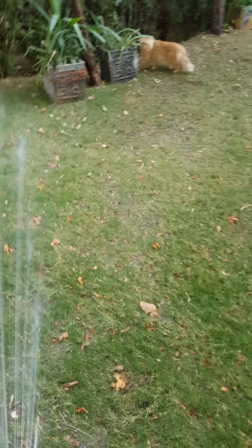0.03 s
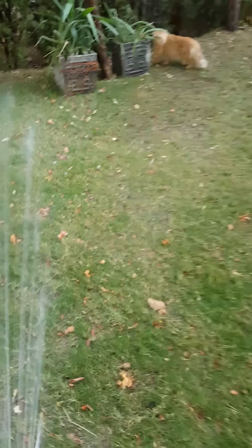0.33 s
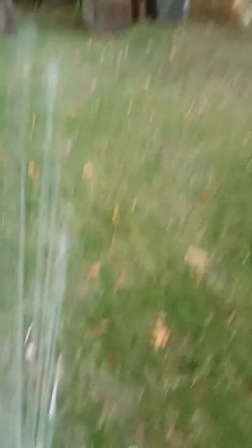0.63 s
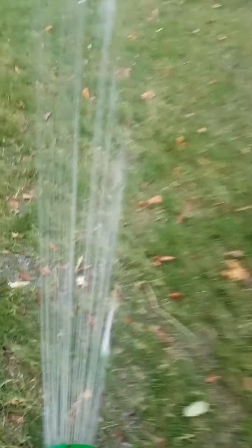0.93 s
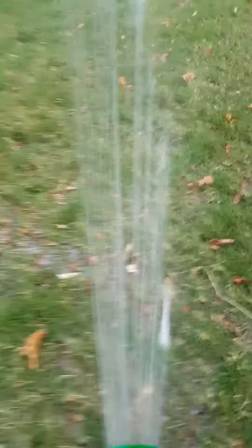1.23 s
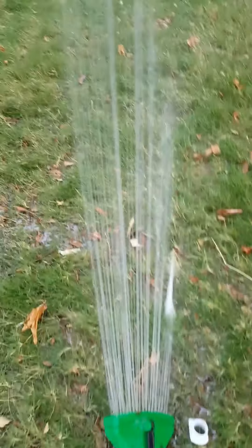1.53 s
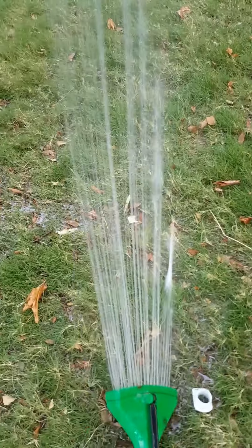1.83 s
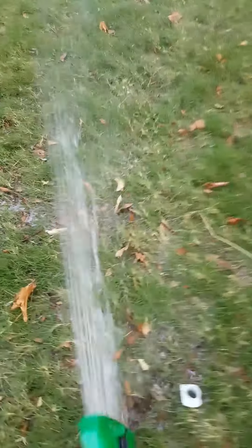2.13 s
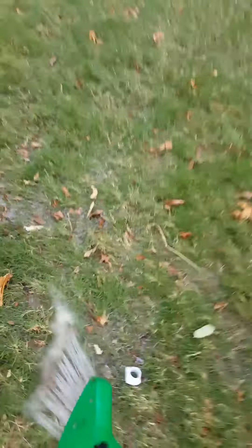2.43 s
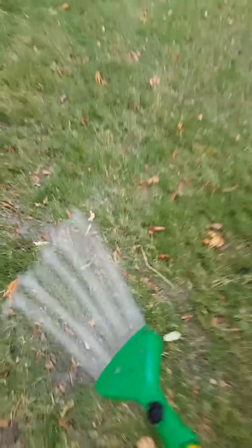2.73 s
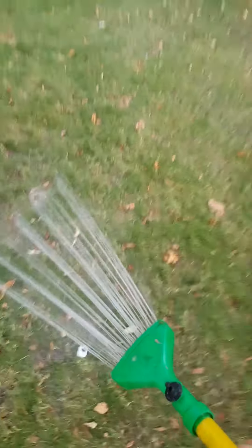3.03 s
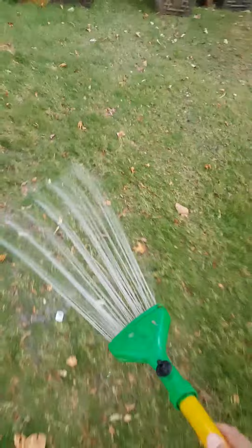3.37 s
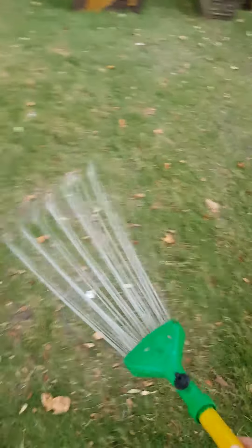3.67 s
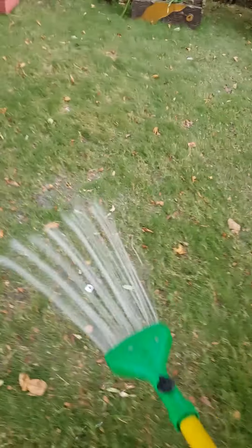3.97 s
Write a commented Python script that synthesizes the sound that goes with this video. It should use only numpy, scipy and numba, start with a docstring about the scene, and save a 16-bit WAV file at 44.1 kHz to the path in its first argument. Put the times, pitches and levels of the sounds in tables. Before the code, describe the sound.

Water from a garden hose patters on the lawn some way off, then swings close to splash and gurgle in a wet patch before fanning over nearby grass. A faint low hum and light wind lie underneath.

```python
"""A garden lawn, watered by a hose with a fan nozzle and heard from just behind the hand.
Under a fine, centred sizzle the long jet lands far off, swings down to splash and gurgle in a sodden
patch at the feet, then opens into a soft fan on the near grass. Drops tick and throw fine spray among
ringing bubbles; the water drums on the soil over a low hum and light wind on the microphone."""
import sys
import numpy as np
from scipy import signal
from scipy.fft import rfft, irfft
from scipy.io import wavfile
from scipy.ndimage import uniform_filter1d, map_coordinates
from numba import njit

SR = 44100
rng = np.random.default_rng(int(sys.argv[2]) if len(sys.argv) > 2 else 0)


def to_wav(s):
    """Save 16-bit WAV."""
    ch = np.atleast_2d(s).T  # columns
    pcm = np.round(np.clip(ch, -1, 1) * 32767)  # PCM
    wavfile.write(sys.argv[1], SR, pcm.astype(np.int16))


N = 176400
TIME = np.arange(N) / SR
TOP_HZ = 15900  # top of the bubble range and of the whole mix


def undb(db):
    """Decibels to gain."""
    return 10 ** (np.asarray(db) / 20)


def unit(x):
    """Scale to rms 1."""
    return x / np.sqrt(np.mean(x ** 2))


def fader(rows):
    """Ride the gain along (t/s, level/dB) points, with a 0.1 s fade beyond each end."""
    t, db = np.array(rows).T
    fades = np.interp(TIME, [t[0] - .1, t[0], t[-1], t[-1] + .1], [0, 1, 1, 0])
    return undb(np.interp(TIME, t, db)) * fades


def surge(peak_s, width_s):
    """A bell-shaped swell of gain."""
    return np.exp(-((TIME - peak_s) / width_s) ** 2)


def equalise(x, curve, depth=1):
    """EQ along (f/Hz, gain/dB) points; depth scales the decibels."""
    hz, db = np.array(curve).T
    f = np.arange(N // 2 + 1) * SR / N
    return irfft(rfft(x) * undb(depth * np.interp(np.log(f + 1), np.log(hz), db)), N)


def wobble(rate_hz):
    """Slow random modulation: sample and hold, slewed twice."""
    hold = int(SR / rate_hz)
    steps = np.repeat(rng.standard_normal(N // hold + 1), hold)
    return unit(uniform_filter1d(uniform_filter1d(steps, hold), hold)[:N])


def stereo_noise(side_db):
    """White noise whose side level sets its width."""
    mid, side = rng.standard_normal((2, N))
    return mid + undb(side_db) * side * np.array([[1], [-1]])


def place(x, eq, pan, levels):
    """Channel strip: EQ, pan by frequency, then fader."""
    panned = equalise(equalise(x, eq), pan, depth=np.array([[.5], [-.5]]))
    return unit(panned) * fader(levels)


# Bearing of the landing spot: t/s, lag of the left microphone/ms
BEARING_LAG = [(.45, .25), (.7, .17), (1.2, .16), (1.55, .09), (1.82, .08), (2.05, .145), (2.5, .145),
               (2.8, -.03), (3.15, 0), (3.45, -.03), (3.8, 0)]

def landings(per_s, scatter_db, spread_ms, centred=False):
    """Random hits, at the landing spot or centred in stereo: sample per side, size, 0-1 pitch draw."""
    when, strength, angle, polarity, pitch = rng.random((int(per_s * N / SR), 5)).T
    bearing_ms = 0 if centred else np.interp(when * N / SR, *np.array(BEARING_LAG).T)
    lag = (bearing_ms + spread_ms * np.log(angle / (1 - angle))) * SR / 1000
    at = np.round(when * N + np.array([lag, -lag]) / 2).astype(np.int64) % N
    size = undb(scatter_db * np.minimum(-np.log(1 - strength), 5))  # many soft, a few hard
    return at, np.sign(polarity - .5) * size, pitch


@njit
def ring(at, hz, size):
    """Each bubble is a damped sine that glides upward."""
    decay_cycles, rise = 9.8, 0.08  # rise: share of the pitch gained in three decay times
    out = np.zeros(N)
    for k in range(len(at)):
        life = decay_cycles * SR / hz[k]
        phase = 0.
        for i in range(min(int(4 * life), N - at[k])):
            phase += 2 * np.pi * hz[k] / SR * (1 + rise * i / (3 * life))
            out[at[k] + i] += size[k] * np.exp(-i / life) * np.sin(phase)
    return out


def bubbles(at, hz, size):
    """Air pockets ring; small ones pack the energy of large ones into a shorter ping."""
    return unit(np.array([ring(side, hz, size * np.sqrt(hz)) for side in at]))


def patter(drops_per_s, scatter_db, spray_db, bubble_db, bubbles_per_s, spread_ms, flutter_db,
           centred=False):
    """Drops tick, each trailing a puff of fine spray, among bubbles; the flow flutters."""
    spray_decay_s, largest_bubble_hz = 0.0078, 710
    at, size, _ = landings(drops_per_s, scatter_db, spread_ms, centred)
    ticks = np.array([np.bincount(side, size, N) for side in at])
    puff_power = signal.lfilter([1], [1, -np.exp(-1 / (spray_decay_s * SR))], ticks ** 2)
    spray = unit(np.sqrt(puff_power) * rng.standard_normal((2, N)))
    at, size, pitch = landings(bubbles_per_s, scatter_db=2.5, spread_ms=spread_ms, centred=centred)
    pings = bubbles(at, largest_bubble_hz + (TOP_HZ - largest_bubble_hz) * pitch, size)
    flutter = undb(flutter_db * wobble(70))
    return (unit(ticks) + undb(spray_db) * spray + undb(bubble_db) * pings) * flutter


# Tone of the wind rumble and of the garden bed: f/Hz, level/dB
WIND_EQ = [(15, -9), (35, -13.5), (65, 3), (95, -2), (135, 2.5), (190, -7.5), (350, -11.5), (700, -19),
           (2000, -56)]
GARDEN_EQ = [(100, -30), (400, -2), (570, -7.5), (900, 5), (1700, -3.5), (3500, -8.5), (8000, -27),
             (16000, -6)]

def air():
    """Light wind buffets the microphone over the faint wash of the garden."""
    wind_db, garden_db = -47, -51.5
    rumble = equalise(stereo_noise(side_db=-14.5), WIND_EQ)
    wind = unit(rumble * undb(0.71 * wobble(11)))
    garden = unit(equalise(stereo_noise(side_db=-1.5), GARDEN_EQ))
    return undb(wind_db) * wind + undb(garden_db) * garden


# Pan shared by the jet, sizzle and splash: f/Hz, left minus right/dB
SHARED_PAN = [(500, -1), (1100, 2), (2200, 2), (4800, -3), (6500, -2), (8200, 5.5), (9800, -2.5),
              (12000, -3), (16000, -1)]
# Tone of the jet on the far lawn: f/Hz, level/dB
JET_EQ = [(300, -3), (600, -4.5), (1000, -5), (1750, 0.5), (3300, -1), (5000, -2.5), (6200, -2), (7500, -3),
          (8400, -1), (9600, -15), (10600, -23), (11800, -35), (16000, -14.5)]
# Its fader ride: t/s, level/dB
JET_LEVEL = [(.13, -56), (.5, -50.5), (.7, -50), (.88, -45), (1.05, -45.5), (1.4, -44.5), (1.82, -44),
             (2.0, -42.5), (2.3, -50)]
# Accent as it sweeps over leaves: t/s, level/dB, decay/s
LEAF_SPATTERS = [(0.616, -48, 0.011)]

def long_jet():
    """Dense, fine patter from the far lawn, with a spatter where it crosses leaves."""
    drops = patter(drops_per_s=5900, scatter_db=1.5, spray_db=0.5, bubble_db=1.0,
                   bubbles_per_s=1900, spread_ms=0.018, flutter_db=0.53)
    for start, db, decay in LEAF_SPATTERS:
        jet_db = np.interp(start, *np.array(JET_LEVEL).T)
        accent = (TIME > start) * np.exp(-np.abs(TIME - start) / decay)
        drops = drops * (1 + undb(db - jet_db) * accent)
    return place(drops, JET_EQ, SHARED_PAN, JET_LEVEL)


# Bright tone of the sizzle: f/Hz, level/dB
SIZZLE_EQ = [(1500, -28), (3400, -3.5), (4400, -1.5), (5500, 4.5), (6300, -0.5), (7400, 6), (9300, -1),
             (10500, 2), (11600, 4.5), (14200, 3.5), (16000, -1.5)]
# Its fader ride: t/s, level/dB
SIZZLE_LEVEL = [(.13, -57.5), (.57, -53), (.615, -47.5), (.72, -48), (.9, -48), (1.1, -49.5), (1.83, -49),
                (2.02, -37.5), (2.18, -37), (2.42, -38), (2.55, -40.5), (2.8, -53), (4.0, -51)]

def sizzle():
    """A fine, bright sizzle, narrow and centred in the stereo image."""
    grains = patter(drops_per_s=13000, scatter_db=0.5, spray_db=-20, bubble_db=-4,
                    bubbles_per_s=2300, spread_ms=0.002, flutter_db=1.65, centred=True)
    return place(grains, SIZZLE_EQ, SHARED_PAN, SIZZLE_LEVEL)


# Dull tone of water hitting soil: f/Hz, level/dB
SOIL_EQ = [(40, -11.5), (100, -1.5), (175, 1), (280, -3), (400, -12.5), (600, -21.5), (1500, -29)]
# Its fader ride: t/s, level/dB
SOIL_LEVEL = [(.13, -53), (.52, -47.5), (.7, -57.5), (1.0, -47), (1.42, -45), (1.56, -44.5), (1.78, -45),
              (1.97, -45.5), (2.38, -43.5), (2.7, -50.5), (2.98, -51), (4.0, -54)]
# Heavier slugs on top: peak t/s, half-width/s, level/dB
SOIL_THUDS = [(1.365, .05, -52), (1.515, 0.021, -45.5), (1.605, .045, -43), (1.96, .04, -51)]

def drumming():
    """Slugs of water thud on the soil, a few of them heavier."""
    at, size, _ = landings(per_s=900, scatter_db=2.0, spread_ms=.13)
    hits = np.array([np.bincount(side, size, N) for side in at])
    accents = sum(undb(db) * surge(peak, width) for peak, width, db in SOIL_THUDS)
    return unit(equalise(hits, SOIL_EQ)) * (fader(SOIL_LEVEL) + accents)


# Harmonics of the hum, fundamental first: level/dB
HUM_HARMONICS = [-7.5, 1, -6, -14.5]
# Its fader ride: t/s, level/dB
HUM_LEVEL = [(.13, -49), (.3, -45.5), (.47, -40), (.54, -40.5), (.61, -61), (.8, -43.5), (1.05, -57),
             (1.25, -56)]

def hum():
    """A wavering low hum that dies away as the nozzle turns."""
    pitch_hz = 59.4 * (1 + 0.017 * wobble(13.3))
    phase = 2 * np.pi * np.cumsum(pitch_hz) / SR
    tone = sum(undb(db + 1.9 * wobble(14.1)) * np.sin(k * phase + 2 * np.pi * rng.random())
               for k, db in enumerate(HUM_HARMONICS, 1))
    return unit(tone) * fader(HUM_LEVEL)


# Tone of the jet swung steeply into the sodden patch: f/Hz, level/dB
SPLASH_EQ = [(300, -15), (600, -6), (850, -2), (1300, -1.5), (2200, 2), (3500, 1), (5000, -3), (6300, -3),
             (8100, -5), (9500, -12), (10300, -15), (11600, -6), (14000, -8.5), (16000, -12.5)]
# Its fader ride: t/s, level/dB
SPLASH_LEVEL = [(1.85, -62), (1.98, -51), (2.08, -38.5), (2.19, -33), (2.42, -33.5), (2.53, -34),
                (2.7, -45.5), (2.8, -60)]

def splash():
    """The jet hits standing water close by."""
    drops = patter(drops_per_s=8000, scatter_db=2.5, spray_db=-1.0, bubble_db=-5.5,
                   bubbles_per_s=2000, spread_ms=0.017, flutter_db=0.74)
    return place(drops, SPLASH_EQ, SHARED_PAN, SPLASH_LEVEL)


# Gulp cues: peak t/s, half-width/s, level/dB, centre f/Hz, pitch range/octaves
GULP_CUES = [(2.2, .09, -46, 1350, .8), (2.41, .11, -45, 930, .55), (2.41, .08, -42.5, 1350, .6),
             (2.34, .14, -41.5, 2300, .8), (2.57, .16, -44, 3000, .55), (2.87, .07, -51, 2100, .5),
             (3.21, .07, -55, 1000, .9), (3.25, .08, -48.5, 2500, .4)]

def gurgle():
    """Water digs into wet ground; each gulp is a short cloud of larger bubbles around one pitch."""
    gulps = 0
    for peak, width, db, hz, octaves in GULP_CUES:
        at, size, pitch = landings(per_s=1400, scatter_db=2.5, spread_ms=0.023)
        cloud = bubbles(at, hz * 2 ** (octaves * (pitch - .5)), size)
        gulps = gulps + undb(db) * surge(peak, width) * cloud
    return gulps


# Pan of the fan landing to the side: f/Hz, left minus right/dB
FAN_PAN = [(500, 3), (1300, 3), (2600, 0.5), (5000, -1), (8200, 4.5), (10000, 9), (13000, 1), (16000, 0)]
# Its tone: f/Hz, level/dB
FAN_EQ = [(300, -17), (600, -7), (900, -6.5), (1500, -4.5), (1900, -1), (2500, -0.5), (3700, -1.5),
          (6000, -2), (8100, 0.5), (9400, -10), (10600, -17.5), (12000, -7), (16000, -8.5)]
# Its fader ride: t/s, level/dB
FAN_LEVEL = [(2.45, -45), (2.66, -34.5), (2.79, -44.5), (2.85, -37.5), (3.0, -38.5), (3.12, -41),
             (3.24, -40), (3.47, -42.5), (3.61, -38), (3.73, -41), (3.85, -38), (4.0, -39)]

def fan():
    """Separate streams break into coarser drops on the near grass."""
    drops = patter(drops_per_s=6000, scatter_db=1.5, spray_db=-1, bubble_db=-4.0,
                   bubbles_per_s=2000, spread_ms=.018, flutter_db=1.05)
    return place(drops, FAN_EQ, FAN_PAN, FAN_LEVEL)


# Close bounce, likely off the hand and nozzle, shifting as they turn: t/s, delay/ms
BOUNCE_DELAY = [(.6, .44), (1.95, .46), (2.1, 1.0), (2.5, 1.2), (2.75, 1.25), (2.92, 1.1), (3.15, .87),
                (3.4, .73), (4.0, .8)]
# Its return, left then right: level/dB
BOUNCE_LEVEL = [-17, -11]

def reflect(x):
    """A short, moving echo combs the hiss and makes it sweep like a flanger."""
    delay_ms = np.interp(TIME, *np.array(BOUNCE_DELAY).T)
    read_at = np.arange(N) - delay_ms * SR / 1000
    return np.array([(side + gain * map_coordinates(side, [read_at])) / np.hypot(1, gain)
                     for side, gain in zip(x, undb(BOUNCE_LEVEL))])


def scene():
    """The four hissing layers take the bounce; gurgle, drumming, hum and air stay dry."""
    return reflect(long_jet() + sizzle() + splash() + fan()) + gurgle() + drumming() + hum() + air()


def record(dry):
    """A gate snaps open out of near silence, and a steep low-pass trims the very top."""
    open_s = 0.1292
    gate = undb(np.interp(TIME, [open_s - .012, open_s + .002], [-56, 0]))
    low_pass = signal.ellip(12, .2, 80, TOP_HZ, fs=SR, output="sos")
    return signal.sosfilt(low_pass, dry * gate)


dry = scene()
out = record(dry)
to_wav(out)
```